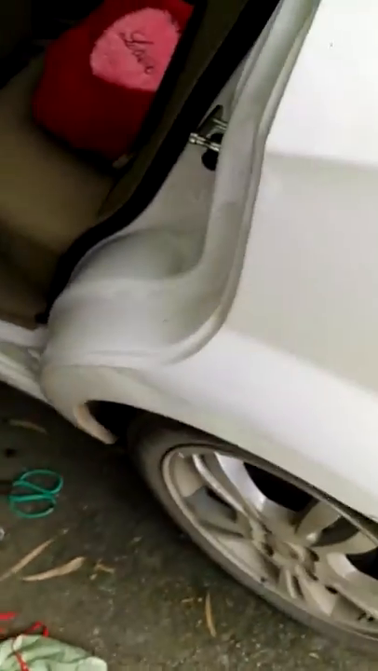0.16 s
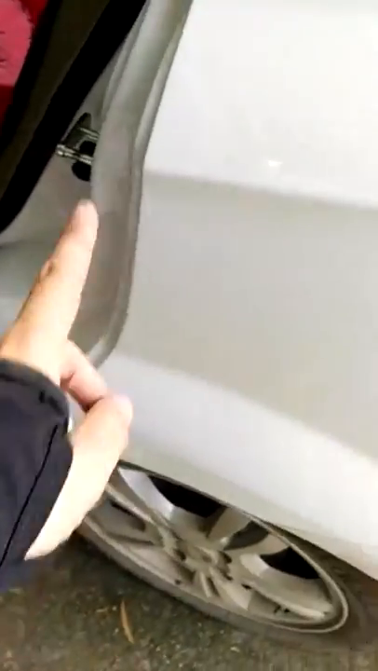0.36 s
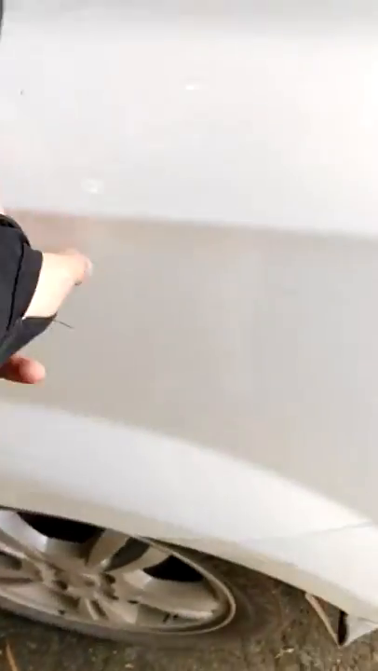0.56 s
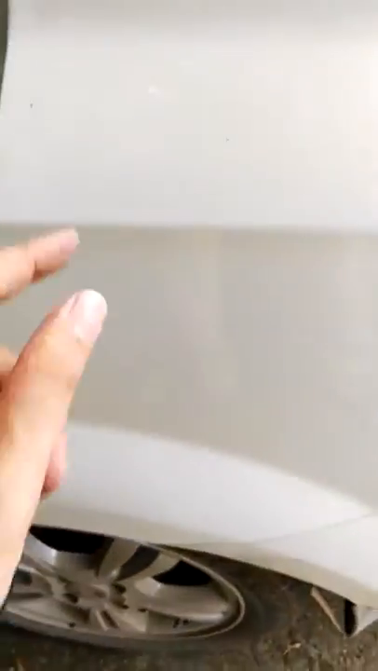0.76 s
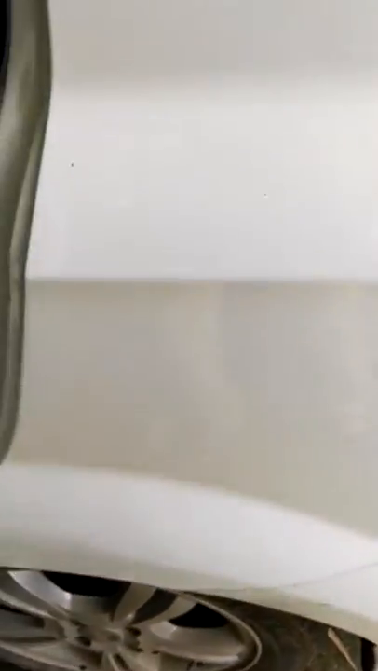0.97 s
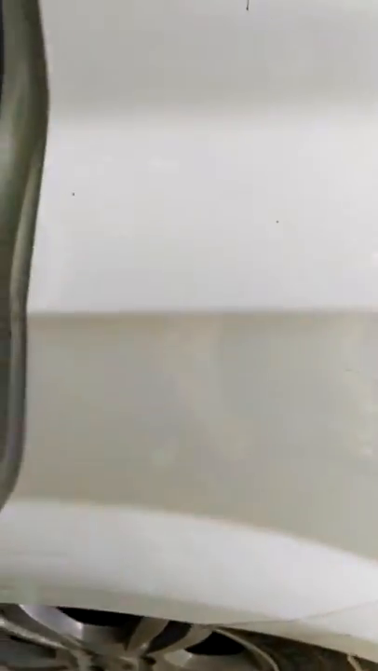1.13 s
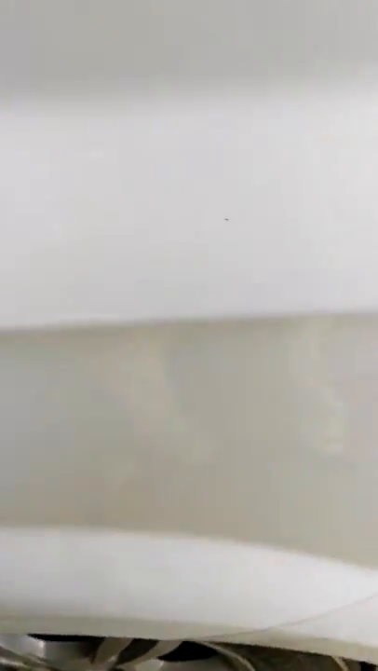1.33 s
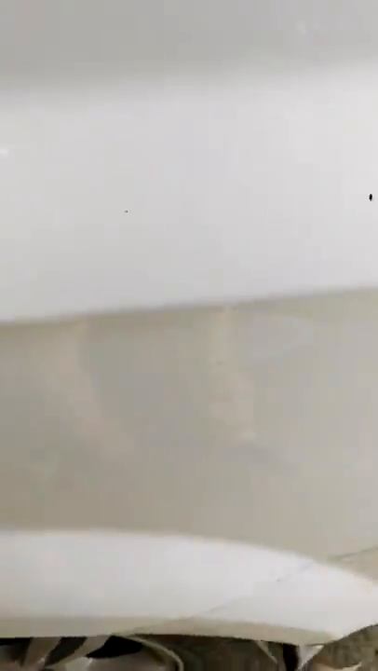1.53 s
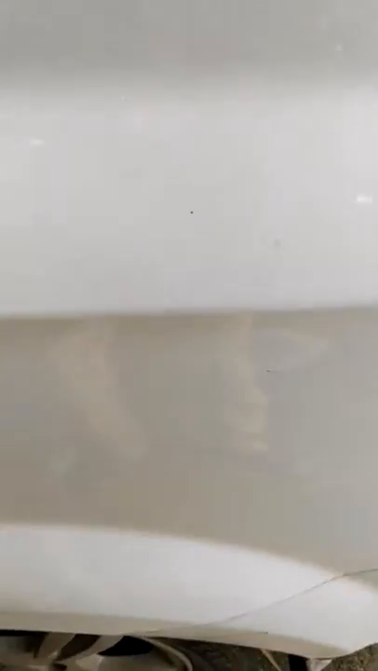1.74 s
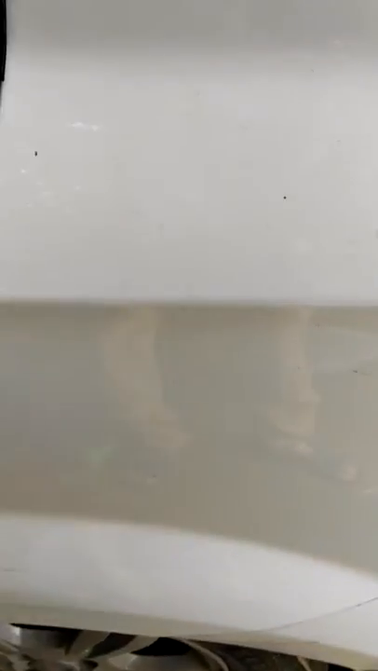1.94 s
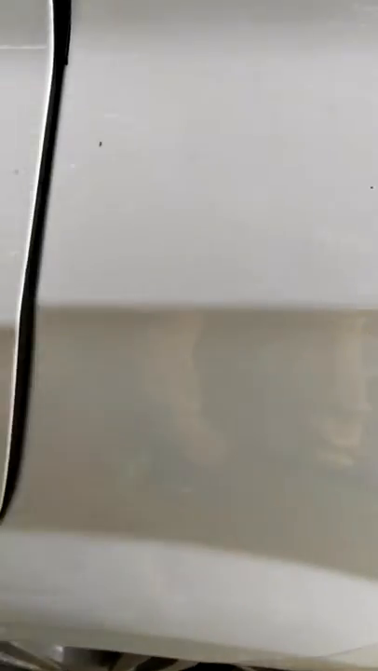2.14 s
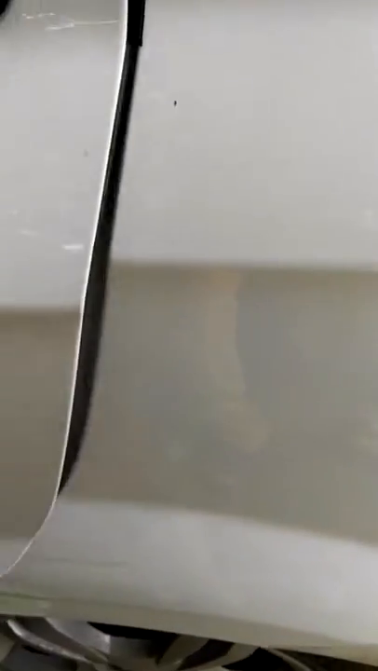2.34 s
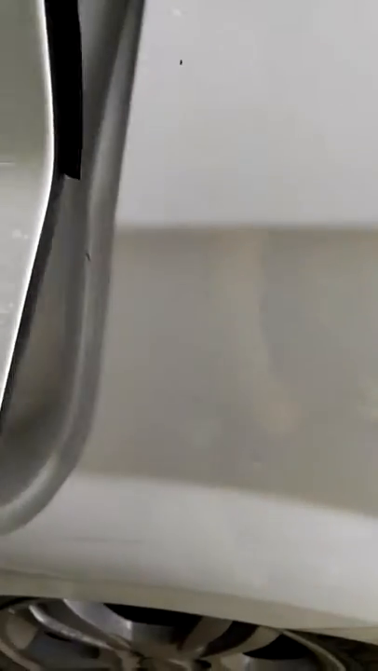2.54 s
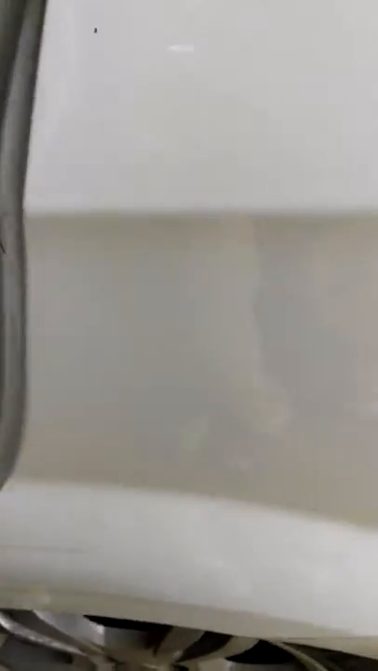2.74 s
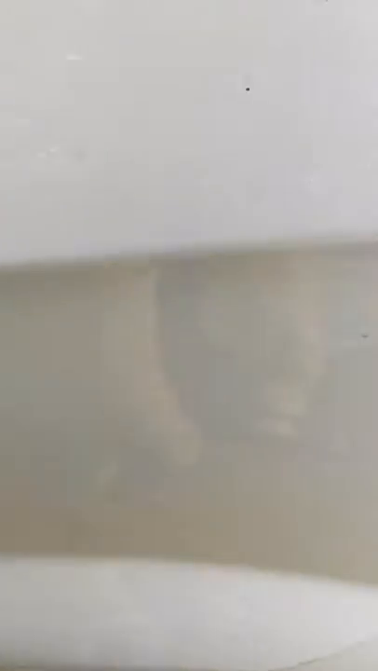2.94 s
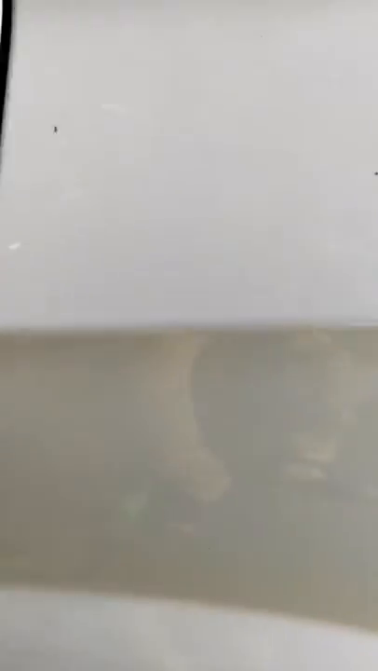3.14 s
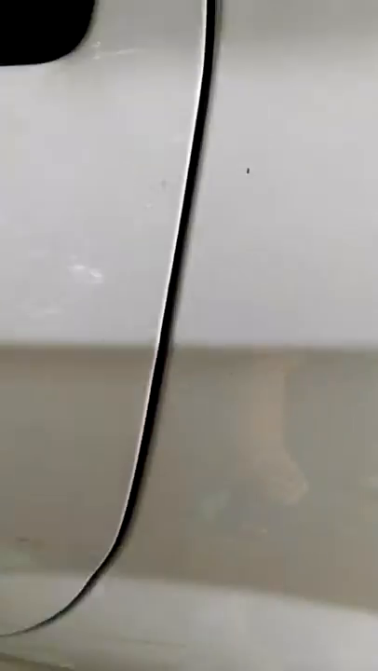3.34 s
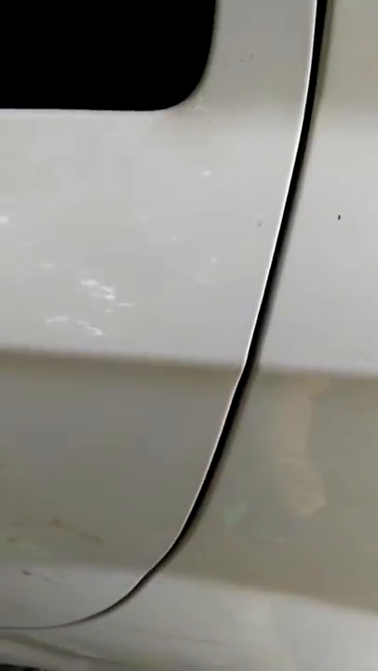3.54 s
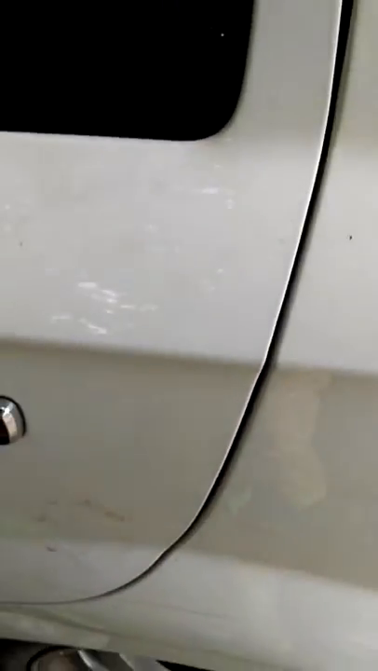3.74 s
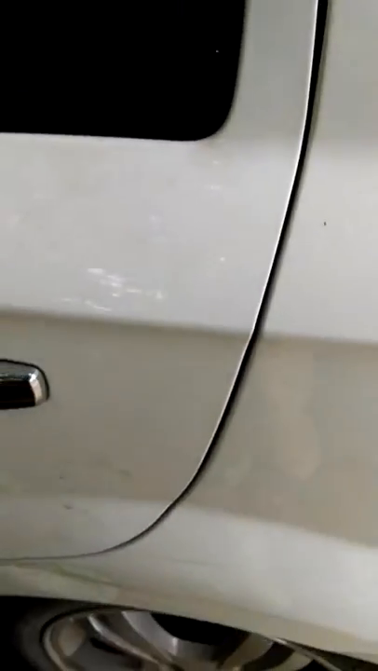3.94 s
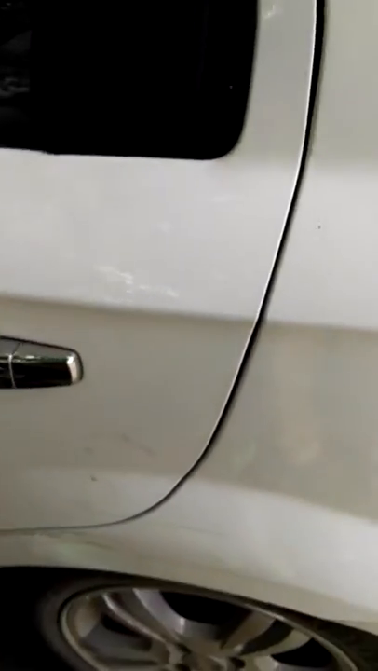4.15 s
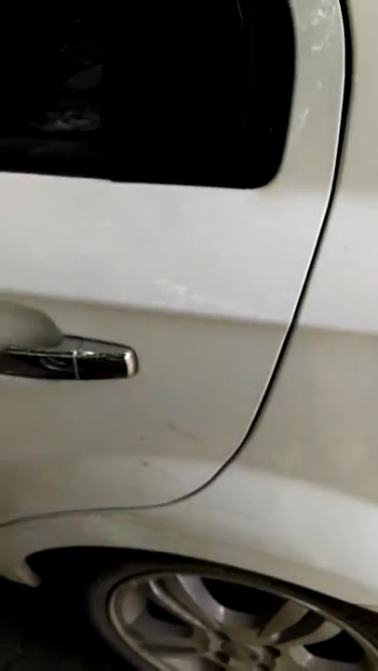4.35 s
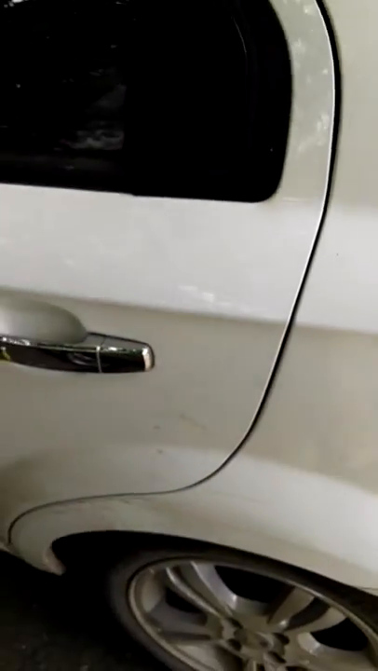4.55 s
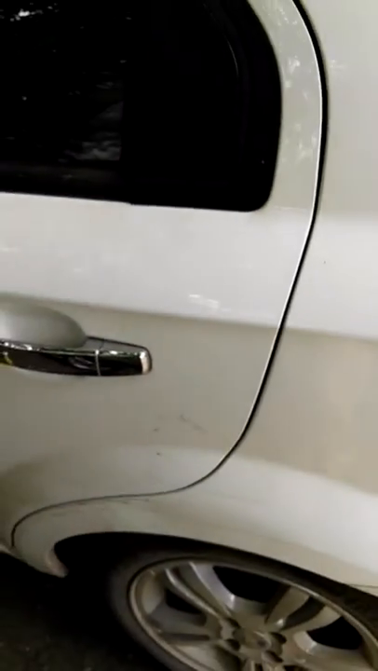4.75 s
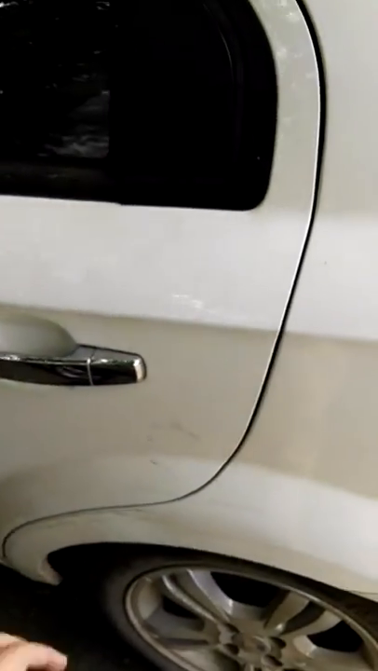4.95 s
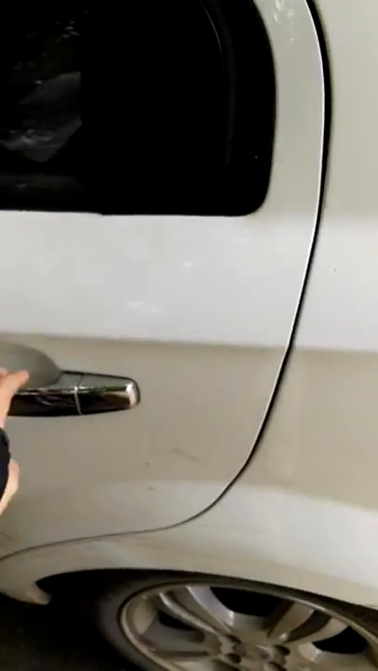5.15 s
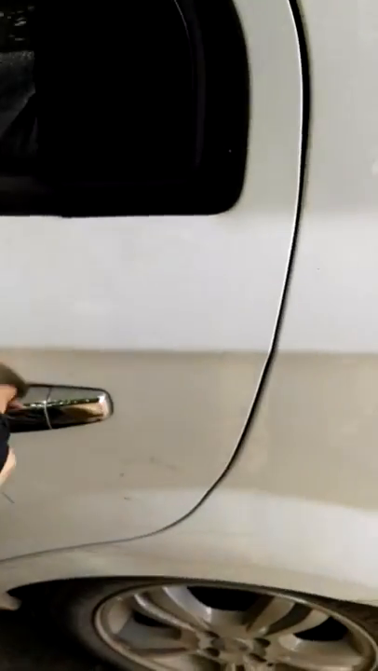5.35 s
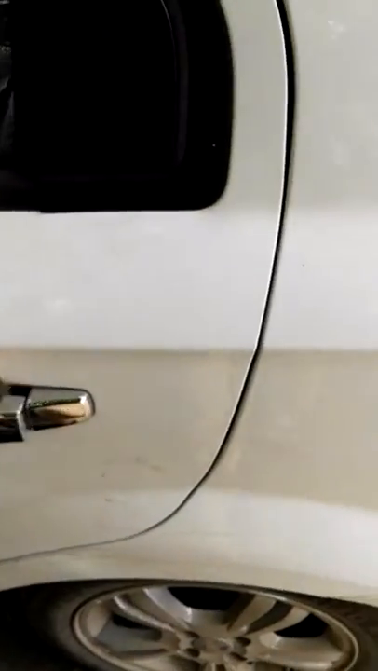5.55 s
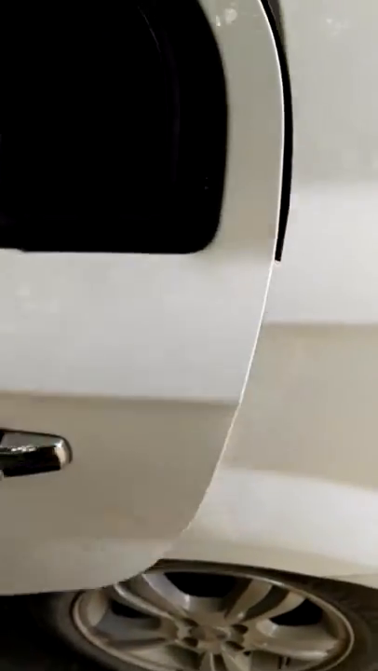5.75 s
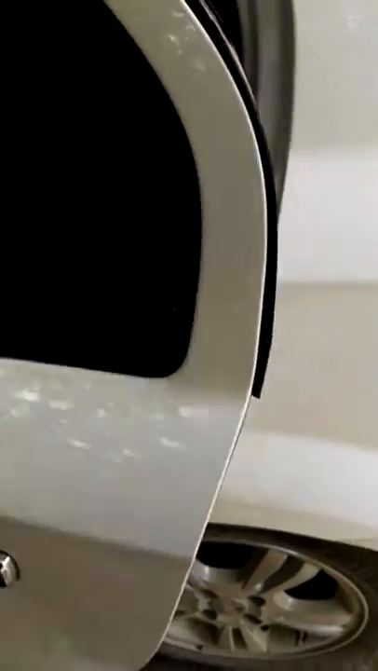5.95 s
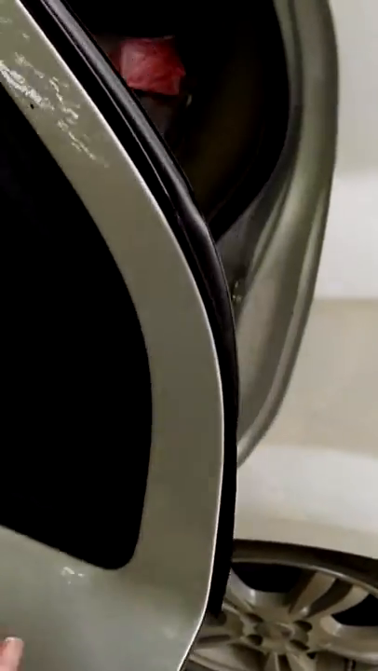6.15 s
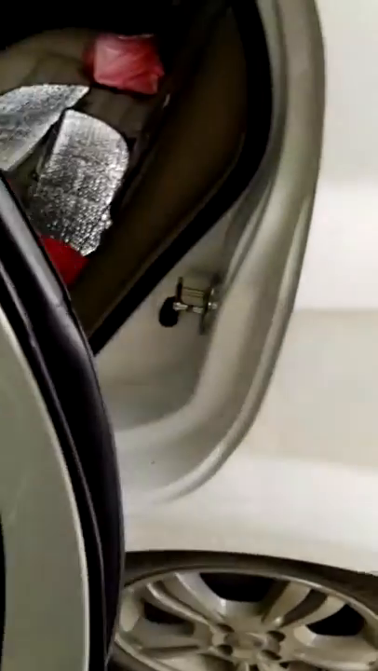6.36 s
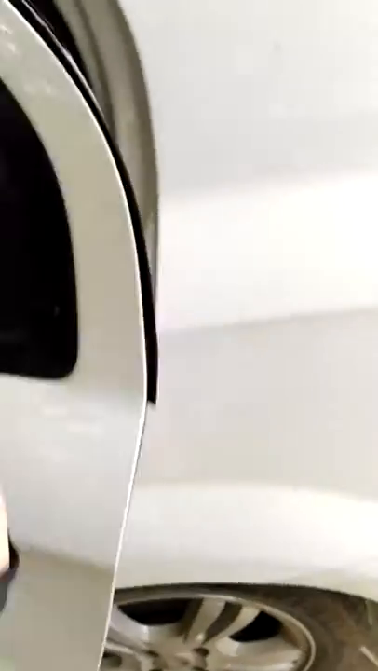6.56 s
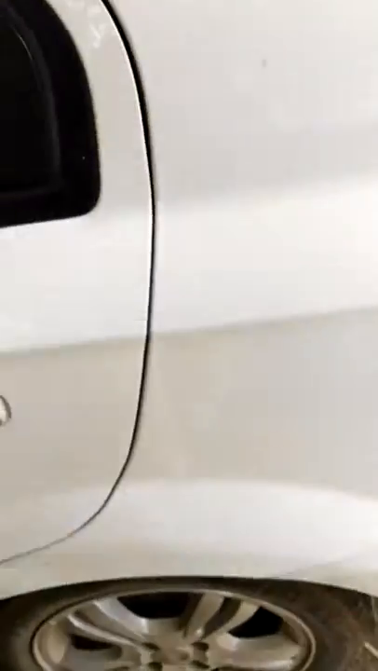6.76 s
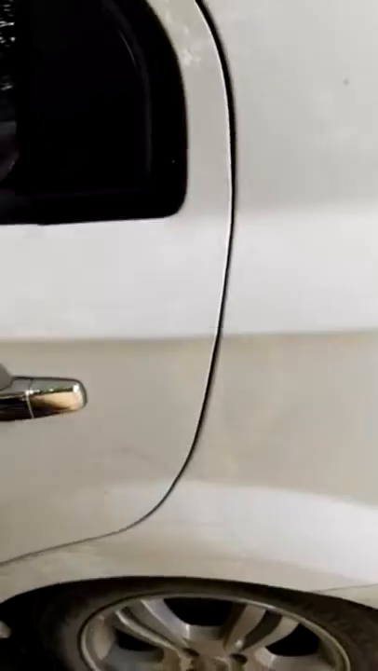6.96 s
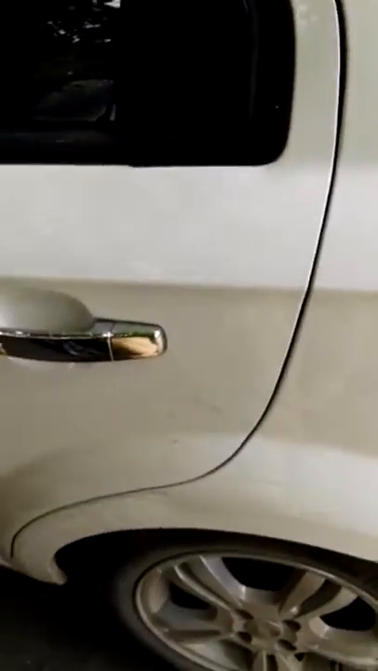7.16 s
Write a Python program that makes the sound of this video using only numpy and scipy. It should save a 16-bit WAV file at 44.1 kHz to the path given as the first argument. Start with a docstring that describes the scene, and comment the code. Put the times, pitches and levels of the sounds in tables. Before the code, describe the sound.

Three loud slams of a car's rear door, heard at arm's length outdoors. Each is a quick double steel latch catch, then a padded thud making panels and cabin boom briefly. Between them come small handle clicks, dull hand bumps, sleeve rustle and two openings, the second much heavier. Low murmur, a distant drone and thin high sizzle stay very quiet underneath. Close stereo pickup with a short, fairly dry yard ring.

```python
"""A low outdoor murmur, a far drone and a faint sizzle near 3 kHz come first, then bumps, clicks and cloth.
The rear door of a car, at arm's length in a yard, is slammed three times and pulled open twice.
A slam is a latch clack, a bright pawl snap and a thud into the seals that sets panels and cabin booming.
Background and cloth are filtered noise; the blows drive decaying modes, short knocks and a noise wash
whose energy decays band by band."""
import sys
import numpy as np
from scipy import signal
from scipy.io import wavfile
from scipy.ndimage import uniform_filter1d

SR = 44100
rng = np.random.default_rng(int(sys.argv[2]) if len(sys.argv) > 2 else 0)


def wrap_up_sound(samples):
    """Save the sound to the file named by the first command line argument, as 16-bit audio."""
    columns = np.atleast_2d(samples).T
    # keep every value between -1 and 1, then stretch to whole-number steps
    tamed = np.clip(columns, -1, 1)
    steps = np.round(tamed * 32767).astype(np.int16)
    wavfile.write(sys.argv[1], SR, steps)


N = 321734


def from_db(db):
    """Decibels to amplitude gain."""
    return 10 ** (np.asarray(db) / 20)


def rms_one(x):
    """Scale to unit power."""
    return x / np.sqrt(np.mean(x ** 2) + 1e-20)


def at_hz(points, hz, axis=1):
    """Interpolate one column of a table on a log-frequency axis."""
    table = np.array(points)
    return np.interp(np.log(hz), np.log(table[:, 0]), table[:, axis])


def panned(db):
    """Left and right gains for a left-minus-right level difference."""
    return from_db([[db / 2], [-db / 2]])


def band_pass(x, low_hz, high_hz, order=2):
    """Butterworth band-pass."""
    shape = signal.butter(order, [low_hz, high_hz], "band", fs=SR, output="sos")
    return signal.sosfilt(shape, x)


def low_pass(x, top_hz, order):
    """Butterworth low-pass."""
    return signal.sosfilt(signal.butter(order, top_hz, fs=SR, output="sos"), x)


def correlated_pair(mid, side, correlation):
    """Mix two independent noises into a stereo pair of given left-right correlation."""
    alike = np.clip(correlation, -1, 1)
    return np.sqrt(1 + alike) * mid + np.sqrt(1 - alike) * side * [[1], [-1]]


# half-octave band centres [Hz]
BAND_HZ = 31.25 * 2 ** np.arange(0, 9.5, .5)
# level difference of the two microphones: (frequency [Hz], left minus right [dB])
MIC_BALANCE = [(60, -2.5), (300, -1.2), (1500, -.5), (3200, -4), (4700, 3.5), (6500, 14), (14000, 12)]


def noise_bands(likeness):
    """Half-octave stereo noise bands, brought to equal power and then given the microphone balance."""
    white, bands = rng.standard_normal((2, 2, N)), []
    for k, hz in enumerate(BAND_HZ):
        mid, side = band_pass(white[k % 2], hz * 2 ** -.25, hz * 2 ** .25)
        pair = correlated_pair(mid, side, at_hz(likeness, hz))
        bands.append(rms_one(pair) * panned(at_hz(MIC_BALANCE, hz)))
    return bands


# murmur spectrum: (frequency [Hz], relative density [dB per Hz])
MURMUR_SPECTRUM = [(30, -18), (60, -1.5), (90, 2), (130, -3), (250, -7), (400, -6.5), (900, -10),
                   (1450, -10), (2000, -17.5), (2900, -18.5), (4000, -26), (5600, -35.5), (8000, -54.5),
                   (16000, -49.5)]
# murmur stereo image, clipped to +-1: (frequency [Hz], left-right correlation [-])
MURMUR_LIKENESS = [(60, 0.76), (250, 0.9), (600, 0.56), (1500, -0.16), (4000, 0.31), (12000, -1.4)]


def murmur(level_db=-47):
    """Steady far outdoor noise, strongest in the bass."""
    out = np.zeros((2, N))
    for hz, band in zip(BAND_HZ, noise_bands(MURMUR_LIKENESS)):
        out += band * np.sqrt(hz) * from_db(at_hz(MURMUR_SPECTRUM, hz))   # density to band level
    return from_db(level_db) * rms_one(out)


def resonant_noise(resonances, likeness):
    """Steady stereo noise gathered in a few narrow resonances."""
    out = np.zeros((2, N))
    for hz, width_hz, level_db in resonances:
        white = rng.standard_normal((2, N))
        mid, side = band_pass(white, hz - width_hz / 2, hz + width_hz / 2)
        out += from_db(level_db) * rms_one(correlated_pair(mid, side, likeness))
    return out


# drone resonances: (frequency [Hz], width [Hz], rms level before panning [dB])
DRONE_RESONANCES = [(100.6, 26, -67.5), (213.7, 22, -60.5), (301.3, 10.3, -58.5)]


def drone():
    """Far drone: three narrow noise resonances, stronger on the right."""
    return resonant_noise(DRONE_RESONANCES, likeness=0.9) * panned(db=-3.0)


# slow growth of the sizzle: (time [s], level [dB])
SIZZLE_GROWTH = [(0, -3), (2.8, -0.5), (3.4, 0.6), (4.2, 2.5), (7.3, 3)]


def sizzle_growth_db():
    """Level curve shared by the sizzle and the top hiss."""
    return np.interp(np.arange(N) / SR, *np.transpose(SIZZLE_GROWTH))


# sizzle resonances: (frequency [Hz], width [Hz], relative rms level [dB])
SIZZLE_RESONANCES = [(1494, 150, -67), (2828, 226, -62.5), (3043, 120, -59), (3308, 26.5, -65.5),
                     (3802, 81, -70), (4460, 310, -68.5), (5700, 770, -76.5)]


def sizzle(growth_db, level_db=-0.5):
    """Slowly growing noise resonances, strongest near 3 kHz and on the right."""
    hiss = resonant_noise(SIZZLE_RESONANCES, likeness=-0.087) * panned(db=-6.0)
    return from_db(level_db + growth_db) * hiss


def rustle(low_hz, high_hz):
    """Cloth noise close to the left microphone, at unit power before panning."""
    return rms_one(band_pass(rng.standard_normal((2, N)), low_hz, high_hz, order=1)) * panned(db=5.5)


# sleeve strokes: (time of peak [s], length [s], hiss level [dB], body level [dB])
BRUSHES = [(.76, 0.065, -68, -65), (2.5, 0.15, -72, -63), (3.2, 0.23, -74, -75), (4.76, 0.13, -86, -54.5),
           (5.76, .18, -72, -64)]


def sleeve(growth_db, rest_db=-76.5):
    t = np.arange(N) / SR
    hiss, body = np.zeros(N), np.zeros(N)
    for s, length_s, hiss_db, body_db in BRUSHES:
        stroke = np.exp(-((t - s) / length_s) ** 2)
        hiss += from_db(hiss_db) * stroke
        body += from_db(body_db) * stroke
    hiss_and_rest = np.hypot(hiss, from_db(rest_db + growth_db))
    return hiss_and_rest * rustle(low_hz=5200, high_hz=11000) + body * rustle(low_hz=800, high_hz=2400)


# door swings: (start [s], end [s], rumble level [dB])
SWINGS = [(2.184, 2.333, -44), (3.66, 3.87, -54.5), (5.513, 6.028, -41.5)]


def swing_rumble(low_hz=65, high_hz=260, fade_s=0.049):
    """Friction shakes the door panel in motion: low noise, faded in and out around each swing."""
    t, motion = np.arange(N) / SR, np.zeros(N)
    for start_s, end_s, level_db in SWINGS:
        corners_s = [start_s - fade_s, start_s, end_s, end_s + fade_s]
        motion += from_db(level_db) * np.interp(t, corners_s, [0, 1, 1, 0])
    shake = rms_one(band_pass(rng.standard_normal(N), low_hz, high_hz))
    return shake * motion * panned(db=6.5)


def clicks(times_s, sizes):
    """One impulse per contact."""
    out = np.full(N, 1e-18)   # floor keeps the filters out of denormals
    np.add.at(out, np.round(times_s * SR).astype(int), sizes)
    return out


def ring(x, hz, t60_s):
    """Two-pole resonator: a unit click starts a decaying sine of initial height 1."""
    r = from_db(-60 / (t60_s * SR))
    w = 2 * np.pi * hz / SR
    return signal.lfilter([0, r * np.sin(w)], [1, -2 * r * np.cos(w), r * r], x)


def thin_tick(time_s=3.455, level_db=-38, hz=14000, t60_s=0.0028):
    """One tiny, very high decaying tick."""
    return ring(clicks(np.array([time_s]), from_db(level_db)), hz, t60_s)


STRIKER_HZ, STRIKER_T60_S = 4530, 0.024
# hand and hinge-stop bumps on the panel: (time [s], ring [dB], knock [dB], knock pitch [Hz])
BUMPS = [(0.616, -46, -35.5, 79), (1.035, -31, -28, 414), (1.072, -40, -29.5, 240), (2, -56, -40, 73),
         (2.41, -31, -29, 244), (2.426, -30, -20, 104), (2.447, -27.5, -20, 245), (2.475, -45, -21, 108.6),
         (2.618, -33, -24, 244), (2.636, -35.5, -25.5, 238), (5.489, -35, -40, 257), (5.655, -51, -20, 276),
         (5.947, -37.5, -22.5, 115), (6.024, -35.5, -25.5, 114), (6.192, -34, -48, 400)]
# latch and handle clicks: (time [s], ring [dB], knock [dB], knock pitch [Hz], snap [dB])
CLICKS = [(1.034, -34, -24.5, 1100, -42), (1.454, -19, -17, 2750, -29.5), (1.471, -24.5, -20, 730, -55),
          (2.221, -39.5, -56, 1700, -52.5), (2.416, -31, -19, 1280, -62), (2.423, -28, -32, 1000, -50),
          (2.618, -26.5, -18.5, 780, -47), (3.042, -46, -33, 1570, -70), (3.138, -49, -39, 1350, -70),
          (5.852, -36, -28.5, 1050, -66), (6.193, -50, -24, 503, -70)]
# tiny handle ticks: (time [s], snap [dB], steel ring [dB])
TICKS = [(5.499, -46, -62), (6.061, -51, -64), (6.533, -46.5, -40)]


# Contact lists, levels relative:
# thuds (time [s], ring [dB], cabin boom [dB], cut-off [Hz], knock [dB], knock pitch [Hz])
# clacks (time [s], ring [dB], cut-off [Hz], knock [dB], knock pitch [Hz])
# snaps (time [s], level [dB]), rings (time [s], level [dB], pitch [Hz], t60 [s])
def light_contacts(click_cut_hz=1800, snap_delay_s=0.00089, bump_cut_ratio=2.04):
    """Bumps, clicks and ticks between the big blows; a low-pitched bump is duller and booms more."""
    thuds, clacks, snaps, rings = [], [], [], []
    for s, ring_db, knock_db, hz in BUMPS:
        boom_db = -15.5 * np.log2(hz / 112)   # dB per octave above 112 Hz
        thuds.append((s, ring_db, boom_db, bump_cut_ratio * hz, knock_db, hz))
    for s, ring_db, knock_db, hz, snap_db in CLICKS:
        clacks.append((s, ring_db, click_cut_hz, knock_db, hz))
        snaps.append((s + snap_delay_s, snap_db))
    for s, snap_db, ring_db in TICKS:
        snaps.append((s, snap_db))
        rings.append((s, ring_db, STRIKER_HZ, STRIKER_T60_S))
    return thuds, clacks, snaps, rings


# openings: (time [s], level [dB], cabin boom [dB], panel pitch [Hz], contact cut-off [Hz], latch [dB],
# latch lead [s], latch spring [dB], spring t60 [s])
OPENINGS = [(2.261, -13.5, -8.5, 357, 740, -7.5, 0.00029, -35, 0.02),
            (5.579, -0.5, -1.5, 267, 420, 0, .008, -37, 0.22)]
# door popping off its seals and rocking:
# (delay [s], ring [dB], cabin boom [dB], knock [dB], ratio to panel pitch [-])
POP_THUDS = [(-.0095, -11.5, -2.5, -8.5, 0.577), (0, -13.5, -5.5, -2, 0.94), (.008, -37, 2, -9.5, .72),
             (.023, -20, -7, -18, 0.97)]
# steel after the latch lets go: (delay [s], ring [dB], knock [dB], ratio to panel pitch [-])
POP_CLACKS = [(0, -25, -18, 4.8), (.002, -25.5, -7, 1.734), (.030, -34, -29.5, 7.3)]


def opening_contacts(clack_cut_hz=1670, snap_db=-51, spring_hz=2055, striker_db=-42):
    """The latch lets go, the door pops off its seals and rocks, and the latch spring rings on."""
    thuds, clacks, snaps, rings = [], [], [], []
    for s, db, boom_db, panel_hz, cut_hz, latch_db, lead_s, spring_db, spring_t60_s in OPENINGS:
        release_s = s - lead_s
        for delay_s, ring_db, depth_db, knock_db, ratio in POP_THUDS:
            thuds.append((s + delay_s, db + ring_db, boom_db + depth_db, cut_hz,
                          db + knock_db, panel_hz * ratio))
        for delay_s, ring_db, knock_db, ratio in POP_CLACKS:
            clacks.append((release_s + delay_s, latch_db + ring_db, clack_cut_hz,
                           latch_db + knock_db, panel_hz * ratio))
        snaps.append((release_s, db + snap_db))
        rings.append((s, spring_db, spring_hz, spring_t60_s))
        rings.append((release_s, db + striker_db, STRIKER_HZ, STRIKER_T60_S))
    return thuds, clacks, snaps, rings


PAWL_DELAY_S, SHUDDER_DELAY_S = .010, .0175
BED_RING_DB, BED_KNOCK_DB, BED_CUT_HZ = -16.5, -5, 550
BED_CLACK_DB, BED_CLACK_CUT_HZ, BED_CLACK_KNOCK_DB, BED_CLACK_HZ = -20.5, 2400, -27, 1310
SETTLE_LOSS_DB, SETTLE_BOOM_DB, SETTLE_PITCH_RATIO = 3, 7, .86
# slams: (time [s], level [dB], cabin boom [dB], time to bed into the seals [s], time to settle [s],
# panel pitch [Hz], shudder [dB], shudder pitch [Hz], latch [dB], pawl snap [dB], striker ring [dB],
# air puff [dB])
SLAMS = [(1.401, -0.5, 0, .034, 0.068, 129, -5.5, 63, -1, -28.5, -21.5, -22),
         (2.900, 0, -2.5, .025, 0.052, 234, -4.5, 117, -1, -31.5, -53, -18.5),
         (6.612, -0.5, -1, .019, .063, 234, -3.5, 295, -4.5, -24.5, -27.5, -10)]
# seal brushing the frame, then the two latch catches:
# (delay [s], ring [dB], cabin boom [dB], contact cut-off [Hz], knock [dB], knock pitch [Hz])
CATCH_THUDS = [(-.029, -35, 2, 300, -37, 107), (.001, -16, -2, 970, -5.5, 197),
               (.008, -16, 3, 800, -7, 345)]
# steel of the two catches: (delay [s], ring [dB], contact cut-off [Hz], knock [dB], knock pitch [Hz])
CATCH_CLACKS = [(0, -15.5, 3030, -3.5, 1510), (.0095, -21, 3500, -10, 652)]


def slam_contacts():
    """Two latch catches and a pawl snap, then the door beds into its seals, shudders and settles."""
    thuds, clacks, snaps, rings = [], [], [], []
    for (s, db, boom_db, bed_s, settle_s, panel_hz, shudder_db, shudder_hz,
         latch_db, snap_db, striker_db, _) in SLAMS:
        for delay_s, ring_db, depth_db, cut_hz, knock_db, hz in CATCH_THUDS:
            thuds.append((s + delay_s, db + ring_db, boom_db + depth_db, cut_hz, db + knock_db, hz))
        bed = (bed_s, db, boom_db, panel_hz)
        shudder = (bed_s + SHUDDER_DELAY_S, db + shudder_db, boom_db, shudder_hz)
        settle = (settle_s, db + shudder_db - SETTLE_LOSS_DB, boom_db + SETTLE_BOOM_DB,
                  panel_hz * SETTLE_PITCH_RATIO)
        for delay_s, push_db, depth_db, hz in (bed, shudder, settle):
            thuds.append((s + delay_s, push_db + BED_RING_DB, depth_db, BED_CUT_HZ,
                          push_db + BED_KNOCK_DB, hz))
        for delay_s, ring_db, cut_hz, knock_db, hz in CATCH_CLACKS:
            clacks.append((s + delay_s, latch_db + ring_db, cut_hz, latch_db + knock_db, hz))
        clacks.append((s + bed_s, latch_db + BED_CLACK_DB, BED_CLACK_CUT_HZ,
                       latch_db + BED_CLACK_KNOCK_DB, BED_CLACK_HZ))
        snaps.append((s + PAWL_DELAY_S, snap_db))
        rings.append((s, striker_db, STRIKER_HZ, STRIKER_T60_S))
    return thuds, clacks, snaps, rings


def die_away(energy, t60_s):
    """Stored energy leaks away exponentially."""
    return signal.lfilter([1], [1, -10 ** (-6 / (t60_s * SR))], energy)


def puffs(t60_s=0.37, top_hz=80):
    """Air squeezed out of the door gap by a slam buffets each microphone on its own."""
    s, *_, puff_db = np.transpose(SLAMS)
    lumps = low_pass(rng.standard_normal((2, N)), top_hz, order=2)
    gust = np.sqrt(die_away(clicks(s, from_db(puff_db) ** 2), t60_s))
    return rms_one(lumps) * uniform_filter1d(gust, size=200)


def force(level_db, cut_hz, hz):
    """Contact strength at one frequency: a soft contact loses the highs."""
    return from_db(level_db) / np.sqrt(1 + (hz / cut_hz) ** 4)


def thud_force(thuds, hz, boom_hz=150):
    """Door contact strength; squeezing the cabin air changes the drive of the deepest modes."""
    _, level_db, boom_db, cut_hz, _, _ = np.transpose(thuds)
    depth = 1 / (1 + (hz / boom_hz) ** 4)
    return force(level_db + boom_db * depth, cut_hz, hz)


def latch_force(clacks, hz):
    """Steel contact strength at one frequency."""
    _, ring_db, cut_hz, _, _ = np.transpose(clacks)
    return force(ring_db, cut_hz, hz)


# phase lead of the left microphone in the ringing: (frequency [Hz], lead [rad])
LEFT_LEAD = [(50, 1.4), (130, 0.98), (240, 0.5), (700, 0.89), (1500, -0.85), (4500, 1.2)]


def struck_modes(blows, sizes_at, modes, level_db, scatter_db):
    """Every blow pushes all modes the same way, with a random level scatter; the right channel lags."""
    times_s, n, out = np.array(blows)[:, 0], np.arange(N), np.zeros((2, N))
    scatter = scatter_db * rng.standard_normal((len(blows), len(modes)))
    for k, (hz, mode_db, t60_s) in enumerate(modes):
        sizes = sizes_at(blows, hz) * from_db(level_db + mode_db + scatter[:, k])
        left = ring(clicks(times_s, sizes), hz, t60_s)
        lag_samples = at_hz(LEFT_LEAD, hz) * SR / (2 * np.pi * hz)
        out += [left, np.interp(n - lag_samples, n, left)]
    return out


def knocks(blows, cycles, rise_cycles):
    """Each contact gives a dead knock at its own pitch that falls 60 dB in the given cycles."""
    out, t = np.zeros((2, N)), np.arange(SR // 3) / SR
    for s, *_, knock_db, hz in blows:
        at, turns = round(s * SR), hz * t
        swing = from_db(knock_db - 60 * turns / cycles) * (1 - np.exp(-turns / rise_cycles))
        lag_rad = [[0], [at_hz(LEFT_LEAD, hz)]]
        out[:, at:at + len(t)] += swing * np.sin(2 * np.pi * turns - lag_rad)
    return out * panned(db=-0.5)


def pings(rings):
    """Clear decaying rings of the striker loop and the latch spring."""
    return sum(ring(clicks(np.array([s]), from_db(db)), hz, t60_s) for s, db, hz, t60_s in rings)


# latch and striker modes: (frequency [Hz], relative level [dB], t60 [s])
LATCH_MODES = [(690, 6, 0.03), (996, -7, 0.035), (1310, -30.5, 0.11), (1490, -5.5, 0.015),
               (1496, -13.5, 0.065), (1780, 2.5, 0.027), (1950, -0.5, 0.034), (2690, -17, 0.042),
               (4280, -7.5, 0.024)]


def steel(clacks, rings, top_hz=5200):
    """Clear latch tones, knocks and rings, with the highest treble left out."""
    sound = struck_modes(clacks, latch_force, LATCH_MODES, level_db=-3.5, scatter_db=1.0)
    sound += knocks(clacks, cycles=23.6, rise_cycles=0.44) + pings(rings)
    return low_pass(sound, top_hz, order=4)


# ring of the yard: (frequency [Hz], t60 [s])
YARD = [(50, 1.0), (200, 0.73), (600, 0.25), (2000, 0.27), (6000, 0.1), (14000, .16)]


def wash_energy(times_s, sizes, wash, hz, yard_db):
    """Energy in one band: dense ring of the struck part plus the weaker ring of the yard."""
    energy = clicks(times_s, (sizes * from_db(at_hz(wash, hz))) ** 2)
    struck_part = die_away(energy, at_hz(wash, hz, axis=2))
    yard = die_away(energy, at_hz(YARD, hz))
    return struck_part + from_db(yard_db) ** 2 * yard


# weak modes and loose trim: (frequency [Hz], relative level [dB per half octave], t60 [s])
DOOR_WASH = [(35.2, -85, 0.33), (56.3, -2, 0.16), (119, -11, 0.37), (247, -4, 0.21), (505, -11.5, 0.24),
             (990, -9, 0.22), (2450, -11, 0.3), (12000, -28, .1)]
# dense latch ring: (frequency [Hz], relative level [dB per half octave], t60 [s])
LATCH_WASH = [(300, -12, 0.099), (713, -3, 0.052), (1500, -6.5, 0.098), (2140, -5, 0.07),
              (3400, -27.5, 0.14), (4800, -29, 0.067), (7000, -98, 0.058), (14000, -27, .07)]
# bright snap: (frequency [Hz], relative level [dB per half octave], t60 [s])
SNAP_WASH = [(1000, -50, 0.0066), (3320, 17, 0.003), (5030, -2, 0.0041), (7800, -12, 0.017),
             (14000, -25, 0.021)]
# stereo image of the blows: (frequency [Hz], left-right correlation [-])
BLOW_LIKENESS = [(50, 0.46), (130, 0.96), (280, 0.96), (600, 0.38), (1500, 0.034), (3500, -0.32),
                 (12000, -0.63)]


def wash(thuds, clacks, snaps):
    """Noise bands shaped by the decaying energy of crowds of weaker modes."""
    out = np.zeros((2, N))
    thud_s, clack_s = np.array(thuds)[:, 0], np.array(clacks)[:, 0]
    snap_s, snap_db = np.transpose(snaps)
    for hz, band in zip(BAND_HZ, noise_bands(BLOW_LIKENESS)):
        energy = wash_energy(thud_s, thud_force(thuds, hz), DOOR_WASH, hz, yard_db=-13.5)
        energy += wash_energy(clack_s, latch_force(clacks, hz), LATCH_WASH, hz, yard_db=-14.5)
        energy += wash_energy(snap_s, from_db(snap_db), SNAP_WASH, hz, yard_db=-19.0)
        swell = np.exp(-4 * min(hz, 1200) / SR)   # low bands build up more slowly
        out += band * signal.lfilter([1 - swell], [1, -swell], np.sqrt(energy))
    return out


# cabin air and door panel modes: (frequency [Hz], relative level [dB], t60 [s])
DOOR_MODES = [(44, -22.5, 0.97), (54, -18, 0.34), (74.8, -10, 0.41), (106.4, -23, 0.29), (124.1, -9, 0.35),
              (144.2, -14.5, 0.73), (179.2, -12, 0.22), (199.7, -8, 0.32), (233.1, -3.5, 0.27),
              (276.4, -4, 0.19), (306, -5.5, 0.13), (343.2, -10.5, 0.15), (430.3, -11.5, 0.22),
              (507, -16.5, 0.35), (530, -38, .18), (657, -23, 0.4), (723, -36, 0.062), (889, -10.5, 0.25)]


def door():
    """Panels, cabin and latch ring in clear modes and in a dense wash of weaker ones."""
    groups = zip(slam_contacts(), opening_contacts(), light_contacts())
    thuds, clacks, snaps, rings = [slam + opening + light for slam, opening, light in groups]
    out = struck_modes(thuds, thud_force, DOOR_MODES, level_db=-2.5, scatter_db=2.0)
    out += wash(thuds, clacks, snaps)
    out += knocks(thuds, cycles=19.1, rise_cycles=0.56)
    return out + steel(clacks, rings) + puffs()


def scene():
    """The door in front of its quiet background."""
    growth_db = sizzle_growth_db()
    background = drone() + sizzle(growth_db) + murmur() + sleeve(growth_db)
    return background + swing_rumble() + thin_tick() + door()


def record(dry, bass_cut_hz=40, top_cut_hz=15900):
    """The microphones lose the deep bass, peaks saturate softly towards full scale, the top is cut."""
    thin = signal.sosfilt(signal.butter(6, bass_cut_hz, "high", fs=SR, output="sos"), dry)
    limited = thin / (1 + thin ** 6) ** (1 / 6)
    return signal.sosfilt(signal.ellip(10, .1, 80, top_cut_hz, fs=SR, output="sos"), limited)


dry = scene()
out = record(dry)
wrap_up_sound(out)
```